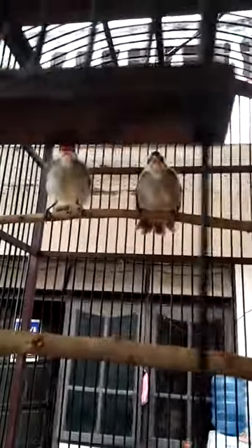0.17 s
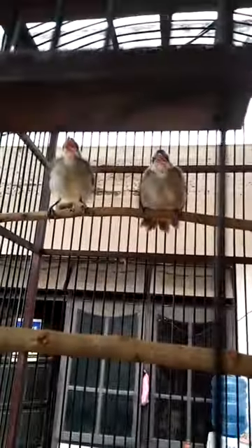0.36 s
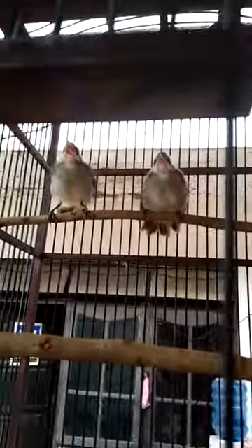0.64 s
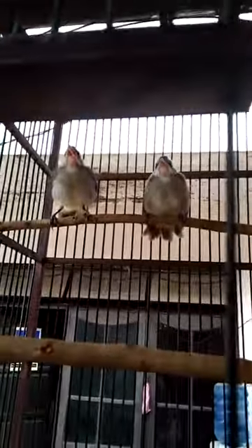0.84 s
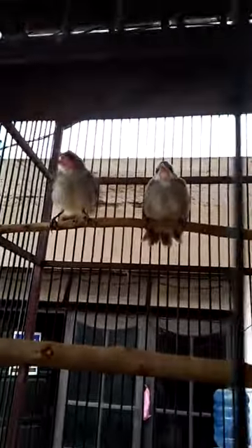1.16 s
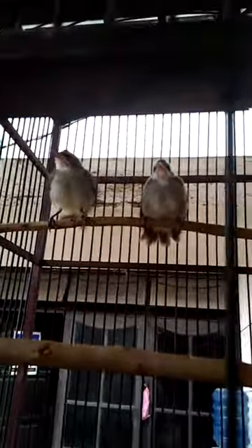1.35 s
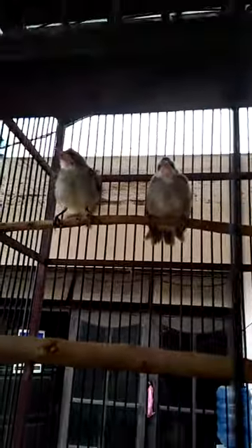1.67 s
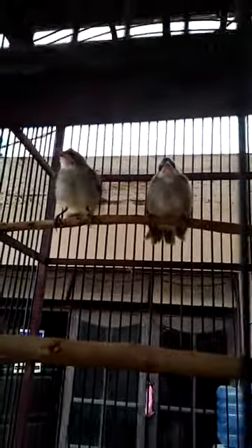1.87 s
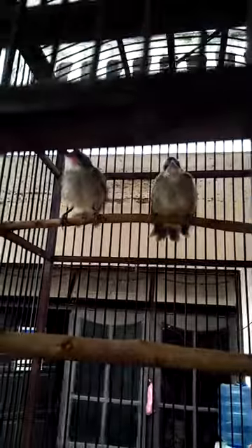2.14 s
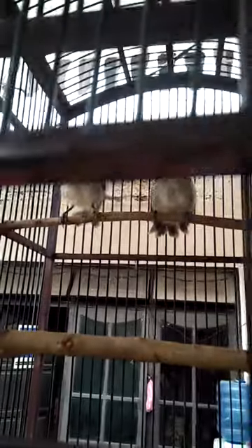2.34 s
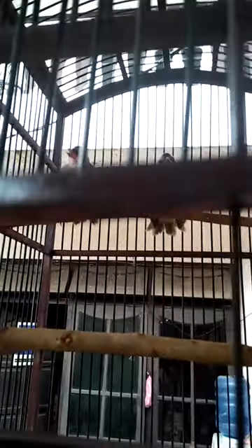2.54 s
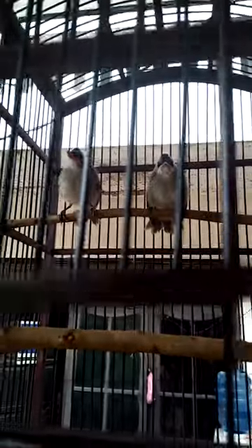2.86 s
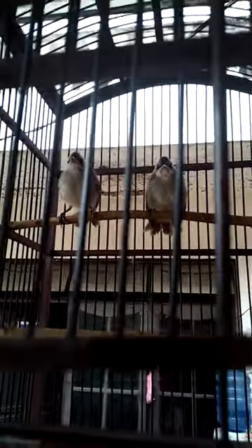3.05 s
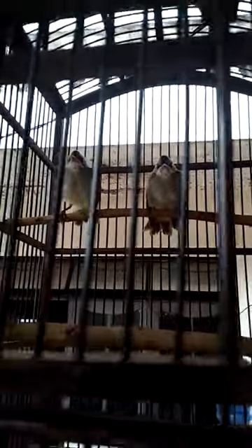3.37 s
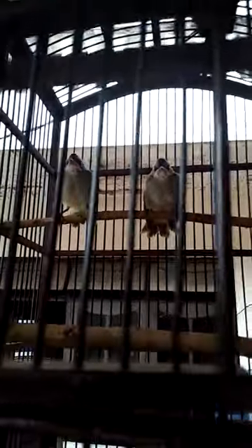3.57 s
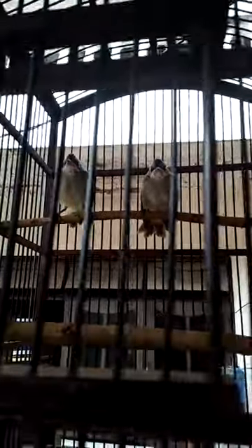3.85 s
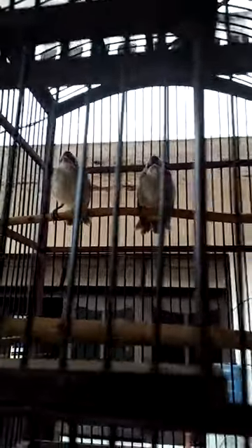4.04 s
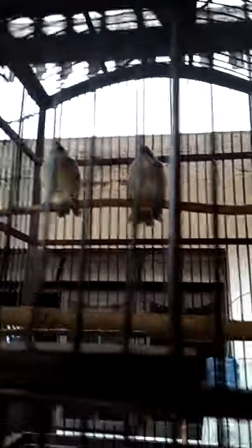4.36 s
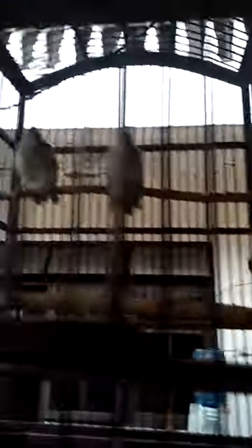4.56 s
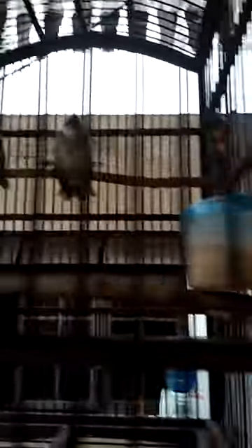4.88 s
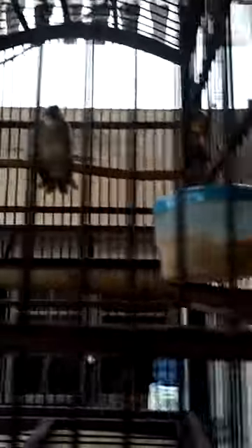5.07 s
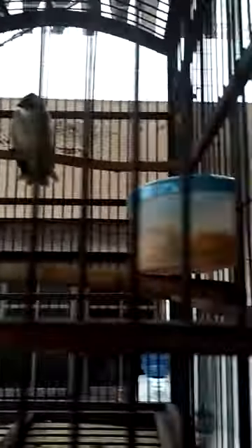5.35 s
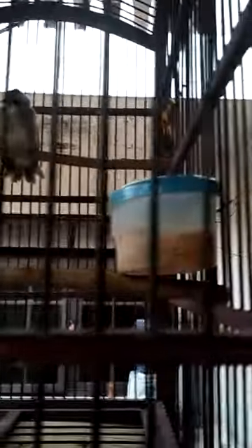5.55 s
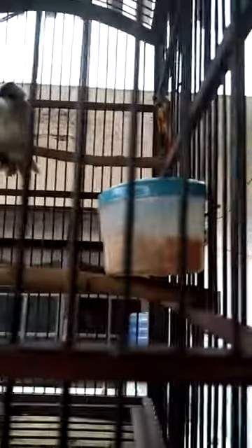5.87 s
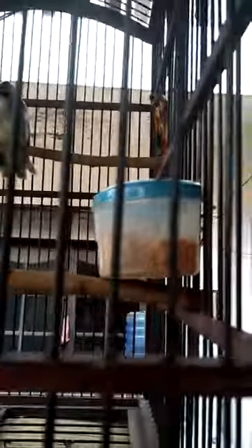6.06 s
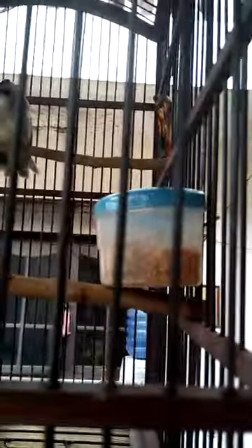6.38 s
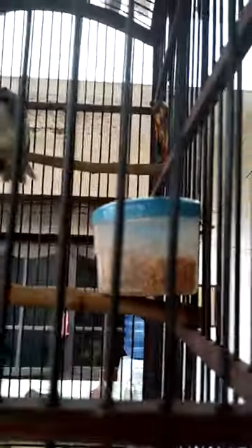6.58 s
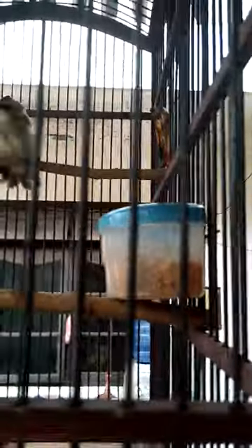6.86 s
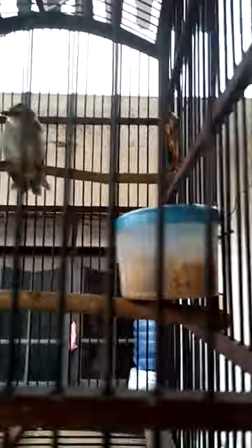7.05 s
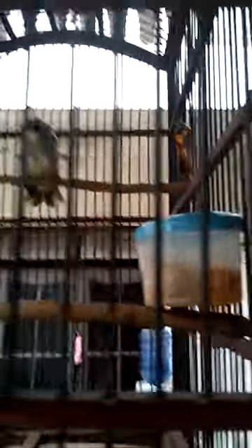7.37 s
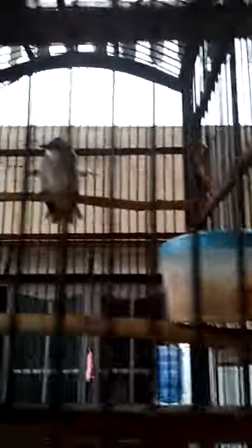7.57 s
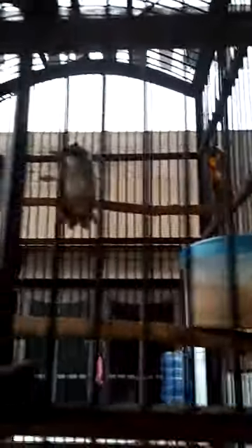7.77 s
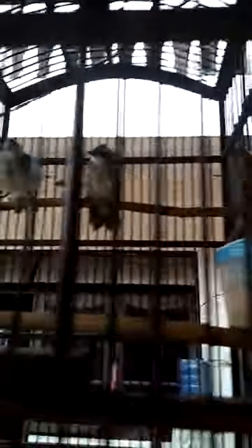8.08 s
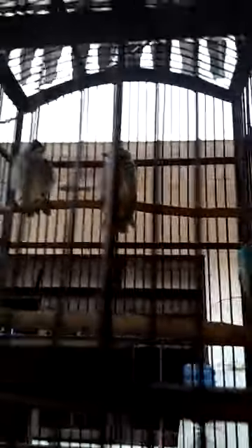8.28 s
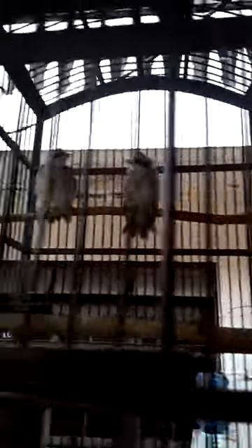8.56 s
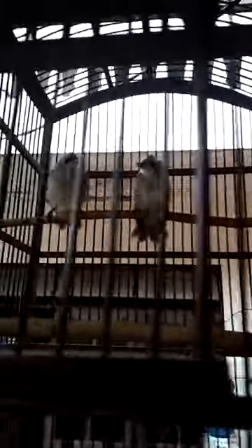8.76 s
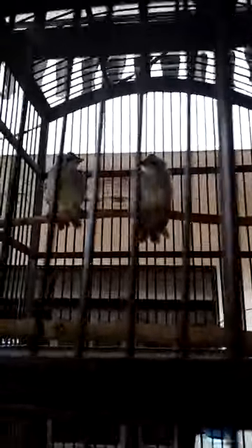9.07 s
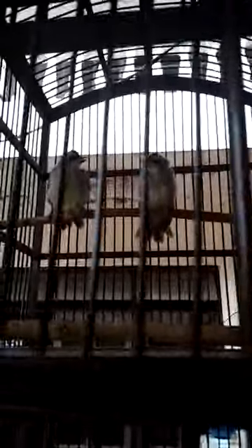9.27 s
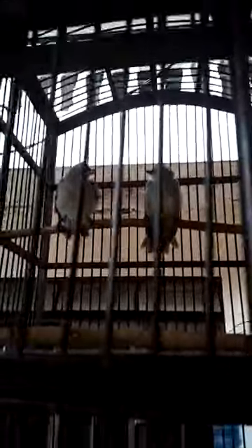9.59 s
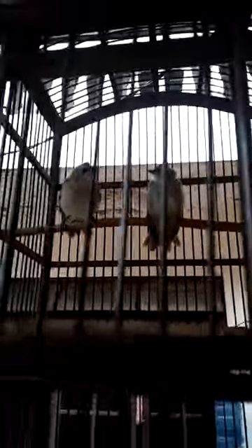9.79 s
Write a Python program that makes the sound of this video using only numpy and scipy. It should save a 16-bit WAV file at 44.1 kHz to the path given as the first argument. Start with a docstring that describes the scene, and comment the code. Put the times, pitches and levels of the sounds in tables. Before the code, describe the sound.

Two young caged songbirds beg near the microphone under a porch roof. From 0.1 to 0.5 s come a close chirp pair and two lone chirps with soft twitters, then a brief swinging warble at 0.65. Reedy, slurred phrases follow at 1.0-1.3, 1.7-1.9 and 2.4-2.75 s: a high pair, then one or two lower answers, with small twitters and another warble at 2.3. A distant, blurred rooster crow stretches from about 1.7 to 3.4 s. The birds rest until about 5.2, when a warble leads into a chirp pair; phrases return at 6.1, 7.1, 8.1 and 9.4 s, with lone chirps at 7.6, 8.6 and 8.8 and faint twitters around 6.9 and 8.7. Soft far calls swell near 0.9, 3.4 and 6.3. Thin treble hiss repeatedly sinks and returns over airy wash and gradually fading low rumble.

```python
"""On a perch in a cage under a roof, two fledgling bulbuls beg. Each phrase is a high pair of slurred, reedy chirps,
a lower answering pair and often a lone chirp or two, with warbles and soft twitters between.
The voices are whistles with overtones plus a rasp. A rooster crows far off, made of two wavering harmonics,
other far calls drift in as soft narrow swells, and a thin noise hiss sinks and returns over a low noise rumble."""
import sys
import numpy as np
from scipy import signal
from scipy.fft import rfft, irfft
from scipy.io import wavfile
from scipy.ndimage import uniform_filter1d, map_coordinates

SR = 44100
rng = np.random.default_rng(int(sys.argv[2]) if len(sys.argv) > 2 else 0)


def wrap_up_sound(samples):
    """Save the sound to the file named by the first command line argument, as 16-bit audio."""
    columns = np.atleast_2d(samples).T
    # keep every value between -1 and 1, then stretch to whole-number steps
    tamed = np.clip(columns, -1, 1)
    steps = np.round(tamed * 32767).astype(np.int16)
    wavfile.write(sys.argv[1], SR, steps)


N = 437472
TIME = np.arange(N) / SR

# The low buzz that creeps up before a chirp or twitter.
# Each row: time in seconds from the top of the call, pitch in Hz, relative whistle level in dB, relative rasp level in dB.
RUN_UP = [(-.034, 1590, -27, -31.5), (-.023, 1700, -12.5, -10.5), (-.013, 1790, -4.5, -2),
          (-.0052, 2034, -1.5, -2)]


def from_db(db):
    """Turn decibels into gain."""
    return 10 ** (np.asarray(db) / 20)


def rms_one(x):
    """Scale to an rms (average strength) of 1."""
    return x / np.sqrt(np.mean(x ** 2) + 1e-20)


def follow(rows, t):
    """Read each column of a curve at the times t, with straight lines between its points."""
    s, *columns = np.transpose(rows)
    return [np.interp(t, s, column) for column in columns]


def wander(rate, size):
    """Smooth random drift around 0, of spread roughly 1, that takes a new value `rate` times a second."""
    at = np.arange(size) * rate / SR
    return map_coordinates(rng.standard_normal(size // 32 + 8), [at], order=2, mode="nearest")


def noise(colour):
    """Noise of rms 1 with the given spectrum, falling away beyond its ends."""
    hz, db = np.transpose(colour)
    log_hz = np.log(np.arange(N // 2 + 1) * SR / N + 1)
    known_log_hz = np.log([hz[0] / 2, *hz, hz[-1] * 2])
    known_db = [db[0] - 60, *db, db[-1] - 60]
    gain = from_db(np.interp(log_hz, known_log_hz, known_db))
    return rms_one(irfft(rfft(rng.standard_normal(N)) * gain, N))


def patchy(x, centres_hz, spread_db, rate):
    """Let each band of a noise swell and sink on its own."""
    spectrum = rfft(x)
    hz = np.arange(N // 2 + 1) * SR / N
    total = 0
    for band in np.eye(len(centres_hz)):
        band_sound = irfft(spectrum * np.interp(hz, centres_hz, band), N)
        total = total + band_sound * from_db(spread_db * wander(rate, N))
    return total


def add(track, s, sound):
    """Mix a sound into the track at time s."""
    i = round(s * SR)
    track[i:i + len(sound)] += sound[:N - i]


def low_pass(x, hz, order=2):
    """Dull the sound above hz."""
    return signal.sosfilt(signal.butter(order, hz, fs=SR, output="sos"), x)


def echo(t60, start_s=0.0017):
    """Dense reflections that die away by 60 dB in t60 seconds; unit energy."""
    t = np.arange(SR) / SR
    return rms_one(rng.standard_normal(SR) * from_db(-60 * t / t60) * (t > start_s)) / np.sqrt(SR)


def rumble(waver_db=5.5):
    """A low noise whose level wavers as it slowly sinks."""
    # Each row: time in seconds, level in dB before the waver.
    rumble_level = [(0, -72.5), (3.3, -74), (6.5, -81.5)]
    # The spectrum of the rumble. Each row: frequency in Hz, relative level in dB per Hz.
    rumble_colour = [(20, -21.5), (48, 2), (85, -1.5), (124, -7.5), (260, -27)]
    return from_db(follow(rumble_level, TIME)[0] + waver_db * wander(22, N)) * noise(rumble_colour)


def open_air(hiss_db, level_db=-69.5, air_share=0.22):
    """The wash of the open air: a patchy noise that sinks a little whenever the hiss does."""
    # The spectrum of the wash. Each row: frequency in Hz, relative level in dB per Hz.
    air_colour = [(170, -19.5), (291, -3), (367, -12.5), (446, -3.5), (950, 0.5), (2440, -9.5),
                  (5200, -17.5), (7000, -33)]
    # level_db holds where the hiss is strongest
    air_db = level_db + air_share * (hiss_db - hiss_db.max()) + 1.1 * wander(5.1, N)
    air = from_db(air_db) * noise(air_colour)
    return patchy(air, np.geomspace(250, 2000, 9), spread_db=3, rate=7)


def hiss_level(waver_db=1.5):
    """The hiss in dB: it wavers, sinks ever faster into each lull and mostly returns more quickly."""
    # The level between the lulls. Each row: time in seconds, level in dB.
    steady_level = [(0, -57.5), (1.4, -61), (3.9, -67), (5.05, -63.5), (5.35, -55), (6.1, -65.5),
                    (6.5, -59), (7.6, -63.5), (9.9, -59)]
    # Each row: deepest moment in seconds, depth in dB, sinking time in seconds, return time in seconds.
    lull_rows = [(0.959, 36, 0.11, 0.027), (3.289, 23, 0.11, 0.093), (3.499, 19.5, .08, 0.069),
                 (4.379, 23.5, 0.034, 0.069), (4.671, 29.5, .11, .13), (5.749, 24, 0.077, 0.037),
                 (6.939, 15.5, 0.2, 0.036), (8.061, 23, 0.16, 0.052), (9.189, 28, 0.18, 0.044)]
    lulls = np.zeros(N)
    for s, depth_db, sink_s, return_s in lull_rows:
        lulls += depth_db * np.exp(-np.maximum((s - TIME) / sink_s, (TIME - s) / return_s))
    return follow(steady_level, TIME)[0] - lulls + waver_db * wander(22, N)


def hiss(hiss_db, side_db=-6.5):
    """A thin, patchy treble noise, with a weaker second noise of opposite sign in the two ears for width."""
    # The spectrum of the hiss. Each row: frequency in Hz, relative level in dB per Hz.
    hiss_colour = [(1180, -44), (2300, -19), (3940, -15), (5030, -9.5), (8960, 12.5), (13700, -6.5)]
    both = noise(hiss_colour) + from_db(side_db) * noise(hiss_colour) * np.array([[1], [-1]])
    return from_db(hiss_db) * patchy(both, np.linspace(5000, 13000, 5), spread_db=1.8, rate=18)


def far_calls(spread_hz=130, droop=.05):
    """Distant calls that droop in pitch, washed out into soft narrow swells."""
    # Each row: middle in seconds, spread to each side in seconds, pitch at the middle in Hz, level in dB.
    far_rows = [(0.9, 0.11, 703, -62), (3.414, 0.096, 634, -63), (6.254, .25, 901, -65.5)]
    out = np.zeros(N)
    # two independent drifts scatter both the strength and the phase
    wash = rms_one(wander(spread_hz, N)) + 1j * rms_one(wander(spread_hz, N))
    for s, spread_s, hz, db in far_rows:
        away = ((TIME - s) / spread_s) ** 2 / 2
        tone = np.exp(2j * np.pi * hz * (TIME - droop * spread_s * away))
        out += from_db(db) * np.exp(-away) * np.real(wash * tone)
    return out


def rooster(harshness=1.2, yard_t60=0.65):
    """A far crow: two harmonics, harsh at first and pure at the end, blurred by the many paths between the houses."""
    # Each row: time in seconds, pitch in Hz, fundamental level in dB, octave level in dB.
    crow_curve = [(1.7, 720, -79.5, -78.5), (1.93, 798.6, -59, -54.5), (2.35, 786.6, -51.5, -53.5),
                  (2.6, 752, -64, -60), (3.2, 756, -74.5, -56.5), (3.36, 740, -82.5, -74)]
    hz, first_db, second_db = follow(crow_curve, TIME)
    start, end = crow_curve[0][0], crow_curve[-1][0]
    # a fast random shake of the phase makes the tone harsh
    harsh = harshness * np.clip(1 - (TIME - start) / 1.57, 0, 1)
    phase = 2 * np.pi * np.cumsum(hz) / SR + harsh * wander(160, N)
    crow = from_db(first_db) * np.sin(phase) + from_db(second_db) * np.sin(2 * phase)
    crow *= (TIME > start) * (TIME < end)
    return crow + .5 * signal.fftconvolve(crow, echo(yard_t60))[:N]


def syrinx(hz, partial_db, rasp_db, lift_db=0, jitter=0.0068, fuzz=.3, fourth_db=-8.0, shimmer=.09):
    """The bird's voice organ: a whistle of four harmonics, plus a rasp whose lines lie halfway between them.

    The rasp comes from alternate cycles that differ. Jitter (share of the pitch) and shimmer (share of each
    harmonic's strength) are small wavers; fuzz (radians) blurs the rasp; fourth_db is relative to the third harmonic.
    """
    size = len(hz)
    phase = 2 * np.pi * np.cumsum(hz * (1 + jitter * wander(900, size))) / SR
    whistle = np.zeros(size)
    for k, db in enumerate([*partial_db, partial_db[-1] + fourth_db], 1):
        harmonic = np.sin(k * phase + rng.uniform(0, 2 * np.pi))
        whistle += from_db(db) * harmonic * (1 + shimmer * wander(500, size))
    # the throat colours the rasp; a wide beak lifts the region around 5.5 kHz
    throat_hz = [900, 1300, 2800, 4200, 5500, 7000, 8600, 11000, 14000]
    throat_db = [-24, -11, 0, -3 + lift_db / 2, -8.5 + lift_db, -5.5 + lift_db / 2, -7, -15, -24]
    rasp = np.zeros(size)
    for k in np.arange(.5, 8):
        gain = from_db(np.interp(k * hz, throat_hz, throat_db)) * (k * hz < SR / 2)
        # higher lines blur into hiss
        blur = fuzz * k * wander(1400, size)
        rasp += gain * np.sin(k * phase + rng.uniform(0, 2 * np.pi) + blur)
    return whistle + from_db(rasp_db) * rms_one(rasp)


def twitters(width_s=0.0032, droop=0.19, run_up_db=-14.0, beak_hz=5400, rasp_lift_db=13.5, rasp_db=-14,
             fuzz=.55, uneven_db=3.5, uneven=.15):
    """Runs of tiny, uneven arches of pitch through a half-closed beak, in a dull rasp; a soft rising buzz starts each."""
    # Each row: top of the first note in seconds, number of notes, seconds from note to note,
    # base pitch in Hz, base fundamental level in dB, base octave level in dB.
    twitter_rows = [(.351, 4, 0.018, 3235, -38, -43), (.518, 1, .015, 2470, -37, -35),
                    (1.38, 4, 0.015, 3344, -38, -58), (1.504, 4, 0.013, 3130, -35, -38.5),
                    (2.16, 4, 0.016, 3260, -36, -52.5), (6.889, 3, 0.015, 3440, -47, -78),
                    (7.006, 3, .0147, 3376, -44.5, -74), (8.677, 3, 0.016, 3280, -47, -66),
                    (8.813, 2, 0.017, 2974, -38.5, -55.5)]
    # The notes of every twitter, in order. Each row: ratio to the base pitch, level in dB added to the base.
    note_rows = [(1.0, -2.5), (1.0, 1), (.93, -.5), (1.1, -9)]
    notes, rasp = np.zeros(N), np.zeros(N)
    t = np.arange(-.02, .02, 1 / SR)
    silent = -np.inf
    for start, count, step_s, run_hz, first_db, second_db in twitter_rows:
        # the stronger the octave, the brighter the rasp
        lift_db = second_db - first_db + rasp_lift_db
        for k, (ratio, note_db) in enumerate(note_rows[:count]):
            away = (t / width_s / np.exp(uneven * rng.normal())) ** 2
            s = start + k * step_s + t[0]
            hz = run_hz * ratio * (1 - 2 * droop * np.tanh(away ** 0.76 / 2))
            db = note_db + uneven_db * rng.normal() + 2 - 3.63 * away
            add(notes, s, syrinx(hz, (first_db + db, second_db + db, silent), silent, jitter=0.024))
            rasp_gain = from_db(first_db + note_db + rasp_db - away)
            add(rasp, s, rasp_gain * syrinx(hz, [silent], 0, lift_db, fuzz=fuzz))
        hz, _, buzz_db = follow(RUN_UP, np.arange(RUN_UP[0][0], RUN_UP[-1][0], 1 / SR))
        run_up = syrinx(hz, [silent], first_db + run_up_db + buzz_db, lift_db, fuzz=fuzz)
        fade_in = signal.windows.hann(2 * len(hz))[:len(hz)] ** .5
        add(rasp, start + RUN_UP[0][0], run_up * fade_in)
    return low_pass(notes + rasp, beak_hz, order=6)


def warbles(rasp_db=-19.5, throat_hz=5200, throat_width_hz=900, twelfth_db=-11.0, throat_db=9.0):
    """Loose, clear calls that swing up and down; the twelfth flares where it crosses the throat's resonance."""
    # One curve for each call. Each row: time in seconds, pitch in Hz before smoothing,
    # fundamental level in dB, octave level in dB.
    warble_curves = [
        [(.62, 2067, -51.5, -54.5), (.629, 2643, -43, -46.5), (.638, 2230, -48.5, -48.5),
         (.651, 2392, -44.5, -30), (.657, 2145, -39.5, -39.5), (.664, 1713, -42, -34), (.674, 1960, -36, -37),
         (.682, 2233, -40.5, -35.5), (.691, 2050, -52, -37)],
        [(2.272, 1890, -55, -44), (2.283, 2990, -31, -55), (2.29, 2470, -45.5, -39.5),
         (2.299, 2796, -27.5, -41.5), (2.306, 2510, -42, -39.5), (2.315, 1798, -41.5, -39),
         (2.323, 2980, -28, -43.5), (2.332, 1757, -57.5, -47.5)],
        [(5.152, 1590, -61.5, -60), (5.183, 2040, -39.5, -55), (5.192, 3764, -30.5, -66),
         (5.201, 2164, -40, -39), (5.21, 3670, -35.5, -43), (5.217, 1956, -41, -41.5), (5.225, 3440, -37, -42),
         (5.233, 2700, -53.5, -53)],
    ]
    out = np.zeros(N)
    for call in warble_curves:
        hz, first_db, second_db = follow(call, np.arange(call[0][0], call[-1][0], 1 / SR))
        hz = uniform_filter1d(hz, size=130)
        flare_db = throat_db * np.exp(-((3 * hz - throat_hz) / throat_width_hz) ** 2)
        third_db = second_db + twelfth_db + flare_db
        voice = syrinx(hz, (first_db, second_db, third_db), np.maximum(first_db, second_db) + rasp_db)
        add(out, call[0][0], voice * signal.windows.tukey(len(hz), .1))
    return out


def chirps(slur_s=.058, slur_hz=1860, slur_rise=0.021, slur_follows=0.42, slur_whistle_db=-8.5, slur_rasp_db=-2.5,
           slur_sag_db_per_s=-72.0, held_rasp_db=-7.5, strength_follows=0.31, leap_s=.0025, release_s=0.006,
           held_bend=0.0054, loose_bend=.008, rasp_waver_db=3.5):
    """Each chirp creeps up in a low voice, leaps to its top, sags and drops; a low buzz joins close pairs."""
    # Each row: time of the top in seconds, shape name, hold in seconds, top pitch in Hz, held pitch in Hz,
    # then the levels of the fundamental, octave and twelfth in dB before the swell.
    chirp_rows = [(0.0908, "open", 0.021, 2760, 2630, -30.5, -19, -34),
                  (.139, "close", 0.0034, 3020, 2850, -30.5, -18, -39),
                  (0.2966, "lone", 0.017, 2713, 2342, -33.5, -25, -40),
                  (0.4786, "lone", 0.017, 2800, 2390, -30.5, -23, -40.5),
                  (1.0167, "open", 0.018, 2875, 2966, -33.5, -24.5, -45.5),
                  (1.0967, "peak", 0.021, 3217, 2994, -32.5, -18.5, -36.5),
                  (1.2418, "answer", .022, 2567, 2505, -32, -24, -31.5),
                  (1.3135, "close", 0.016, 2896, 2672, -31.5, -20, -35),
                  (1.6881, "open", 0.018, 2826, 2720, -32.5, -24.5, -44),
                  (1.756, "peak", 0.023, 3094, 2757, -33, -19.5, -33.5),
                  (1.883, "close", .02, 2700, 2556, -31, -21.5, -34.5),
                  (2.422, "open", 0.016, 2860, 2740, -31.5, -26, -46),
                  (2.499, "peak", 0.015, 3080, 2888, -31, -18.5, -34.5),
                  (2.6674, "answer", 0.019, 2656, 2498, -31.5, -22.5, -48),
                  (2.7466, "close", 0.018, 2790, 2475, -32, -21, -42),
                  (5.3689, "open", .017, 2980, 2968, -29.5, -30, -29.5),
                  (5.4628, "peak", 0.017, 2990, 2688, -32.5, -32, -32),
                  (6.1042, "open", 0.017, 3006, 2914, -30, -43, -39),
                  (6.17, "peak", 0.017, 3200, 2975, -31, -32, -27),
                  (6.3235, "answer", 0.017, 2763, 2610, -31.5, -39.5, -31.5),
                  (6.406, "close", 0.02, 2830, 2598, -32, -35.5, -33.5),
                  (7.1073, "open", .0163, 3000, 3054, -28, -35.5, -37.5),
                  (7.1775, "peak", 0.017, 3290, 3112, -30, -28.5, -29.5),
                  (7.3215, "answer", 0.02, 2665, 2610, -29.5, -30.5, -33),
                  (7.398, "close", .018, 2964, 2707, -30.5, -26.5, -32.5),
                  (7.5973, "lone", 0.018, 2880, 2390, -29.5, -34, -56),
                  (8.1445, "open", 0.016, 2885, 2880, -33.5, -29, -38),
                  (8.2135, "peak", .0173, 3042, 2909, -31, -24, -31.5),
                  (8.351, "answer", 0.023, 2640, 2560, -30.5, -29, -39),
                  (8.4217, "close", 0.016, 2880, 2687, -31.5, -25.5, -37),
                  (8.6207, "lone", 0.015, 2776, 2483, -31.5, -28, -45),
                  (8.7728, "lone", 0.015, 2880, 2313, -31.5, -32, -62),
                  (9.369, "open", 0.015, 2850, 2861, -33, -30, -41.5),
                  (9.4468, "peak", 0.019, 3007, 2891, -33, -26, -33),
                  (9.6018, "answer", 0.018, 2560, 2514, -32.5, -29.5, -34.5),
                  (9.684, "answer", 0.018, 2576, 2534, -33, -29.5, -37.5)]
    # A chirp's shape depends on its place in the phrase. Each entry: sag as a share of the held pitch,
    # fall time in seconds, swell over the hold in dB, rasp in dB relative to the chirp's strength.
    shapes = {"open": (.01, .009, 3, -18), "peak": (.012, .009, 1, -10), "answer": (.02, .014, -2, -10),
              "close": (.035, .013, -3, -13), "lone": (.035, .011, -5, -11)}
    # The fall after the hold. Each row: share of the fall time, share of the height above the low voice
    # that is left, relative whistle level in dB, relative rasp level in dB.
    fall_rows = [(.45, .62, -4, -3), (.9, 0, -3, -4), (1.15, -.05, -13, -8)]
    # The low voice of run-ups and slurs: fundamental, octave and twelfth, in dB relative to the chirp's strength.
    low_voice_db = (-9.5, -7.5, -12.5)
    out, last_end = np.zeros(N), 0
    usual_hz = np.mean([row[4] for row in chirp_rows])
    for s, name, hold, top_hz, held_hz, *held_db in chirp_rows:
        sag, fall_s, swell_db, rough_db = shapes[name]
        first_db, second_db, _ = held_db
        # brighter chirps have a stronger low voice and rasp, and higher ones rest on a higher buzz
        strength_db = first_db + strength_follows * (second_db - first_db)
        low_hz = slur_hz * (held_hz / usual_hz) ** slur_follows
        run_up, gap = RUN_UP, s - last_end
        if gap < slur_s:
            # the longer the slur, the more its level sags
            sag_db, from_hz = slur_sag_db_per_s * gap, low_hz * (1 - slur_rise)
            run_up = [(-gap - release_s, from_hz, -25, -20),
                      (-gap, from_hz, slur_whistle_db, slur_rasp_db),
                      (-gap / 2, low_hz, slur_whistle_db + sag_db, slur_rasp_db + sag_db / 2),
                      RUN_UP[-1]]
        last_hz = held_hz * (1 - sag)
        held = [(-leap_s, .95 * top_hz, -swell_db / 2 - 4.5, held_rasp_db),
                (0, top_hz, -swell_db / 2, held_rasp_db),
                (.4 * hold, held_hz, 0, held_rasp_db),
                (hold, last_hz, swell_db / 2, held_rasp_db)]
        fall = [(hold + part * fall_s, low_hz + left * (last_hz - low_hz), *levels)
                for part, left, *levels in fall_rows]
        curve = [*run_up, *held, *fall, (fall[-1][0] + release_s, 1750, -35, -25)]
        hz, whistle_db, buzz_db = follow(curve, np.arange(curve[0][0], curve[-1][0], 1 / SR))
        # as the pitch rises it grows firm, and the low voice gives way to the chirp's own colour
        high = np.clip((hz - low_hz) / (last_hz - low_hz), 0, 1)
        partial_db = [whistle_db + high * db + (1 - high) * (strength_db + low_db)
                      for db, low_db in zip(held_db, low_voice_db)]
        bend = held_bend + loose_bend * (1 - high)
        hz = uniform_filter1d(hz, size=56) * (1 + bend * wander(90, len(hz)))
        rasp_db = strength_db + rough_db + buzz_db + rasp_waver_db * wander(150, len(hz))
        lift_db = .7 * (second_db - first_db) - 2.5
        add(out, s + curve[0][0], syrinx(hz, partial_db, rasp_db, lift_db))
        last_end = s + fall[-1][0]
    return out


def beak(x, dip_hz=4200, dip_db=-1.5, gape_hz=11300):
    """The beak dulls the very top and weakens the region between the fundamental and the octave."""
    dip = signal.lfilter(*signal.iirpeak(dip_hz, 4, fs=SR), x)
    return low_pass(x + (from_db(dip_db) - 1) * dip, gape_hz, order=4)


def porch(x, near_db=-8.0, near_t60=0.09, room_db=-17.0, room_t60=0.38, dull_hz=7000, wide_db=-23.0, wide_hz=6300):
    """Quick scatter from the cage, then the duller tail of the room; only treble scatter differs between the ears."""
    room = low_pass(echo(room_t60, 0.014), dull_hz)
    treble = signal.butter(4, wide_hz, "high", fs=SR, output="sos")
    wide = signal.sosfilt(treble, echo(near_t60))
    middle = signal.fftconvolve(x, from_db(near_db) * echo(near_t60) + from_db(room_db) * room)[:N]
    side = from_db(wide_db) * signal.fftconvolve(x, wide)[:N]
    return x + middle + side * np.array([[1], [-1]])


def scene():
    """Everything sits in the middle; only the treble has some width."""
    hiss_db = hiss_level()
    background = rumble() + open_air(hiss_db) + hiss(hiss_db)
    birds = porch(twitters() + beak(warbles() + chirps()))
    return background + far_calls() + rooster() + birds


def record(dry):
    """Cut the top steeply above 14.5 kHz."""
    return signal.sosfilt(signal.ellip(10, .2, 80, 14500, fs=SR, output="sos"), dry)


dry = scene()
out = record(dry)
wrap_up_sound(out)
```